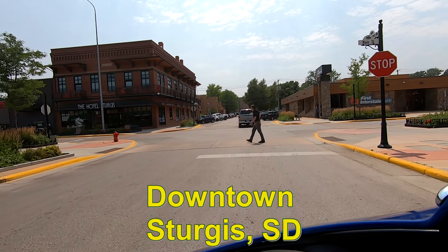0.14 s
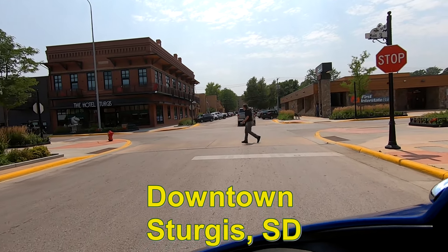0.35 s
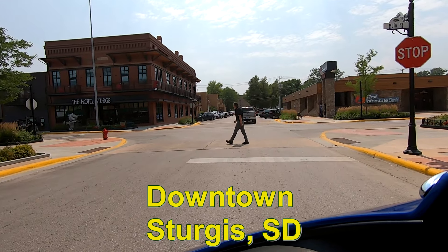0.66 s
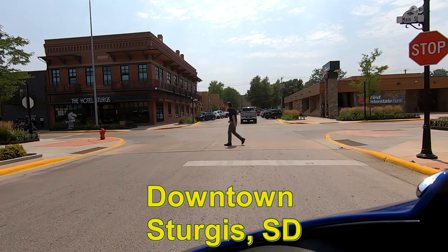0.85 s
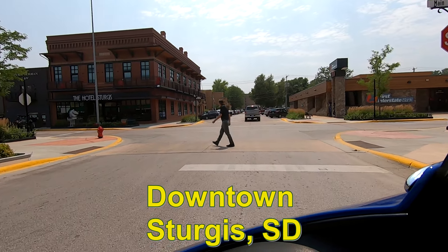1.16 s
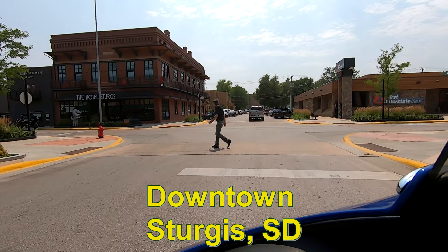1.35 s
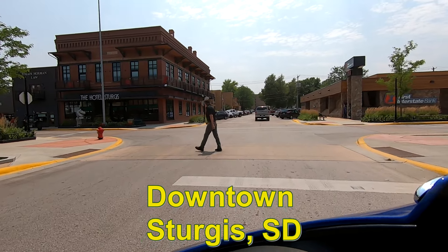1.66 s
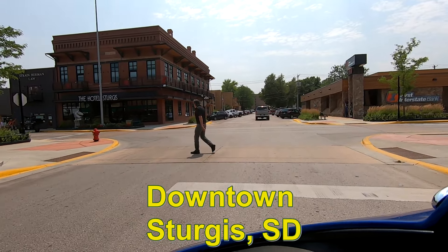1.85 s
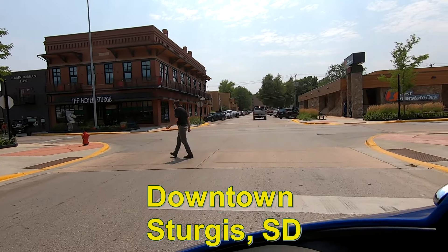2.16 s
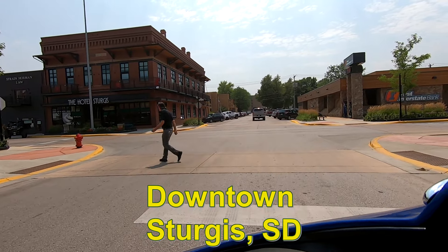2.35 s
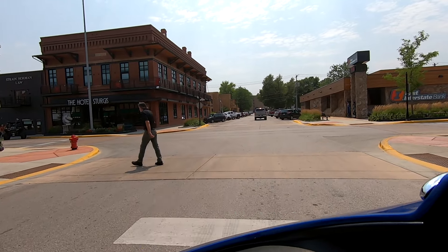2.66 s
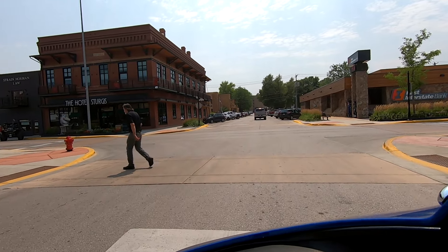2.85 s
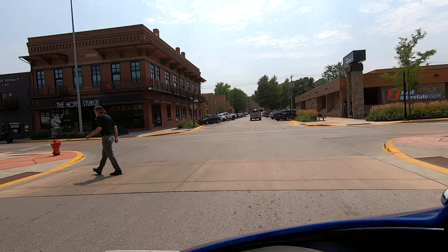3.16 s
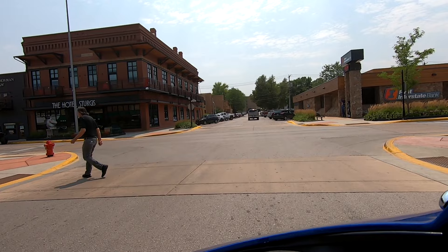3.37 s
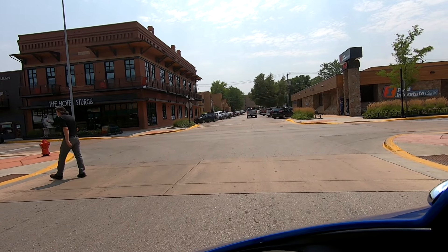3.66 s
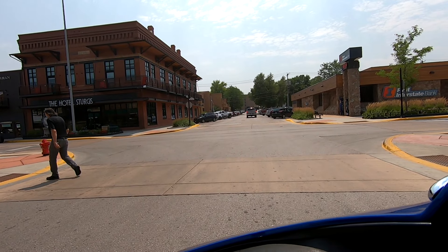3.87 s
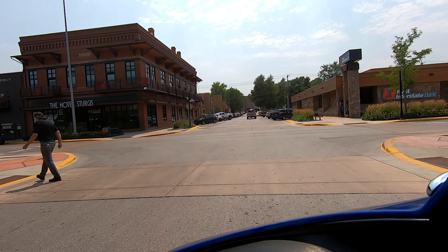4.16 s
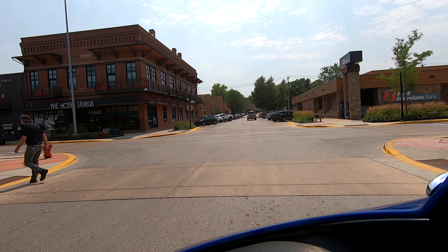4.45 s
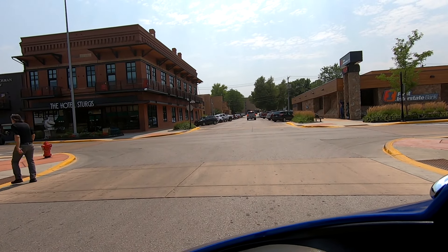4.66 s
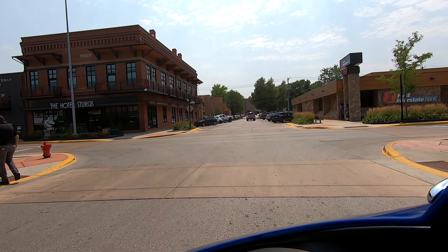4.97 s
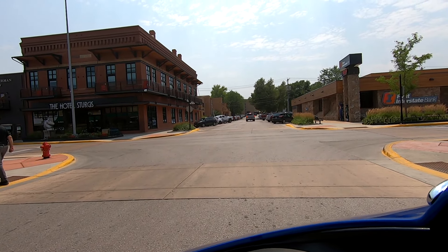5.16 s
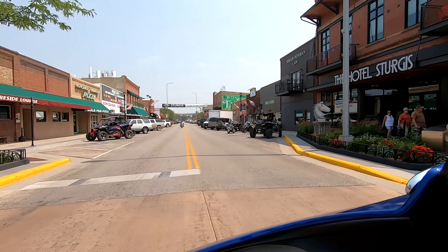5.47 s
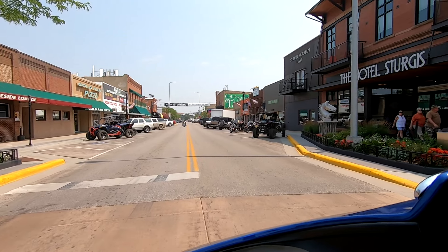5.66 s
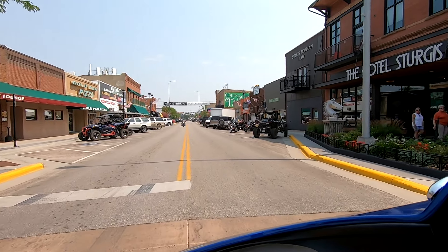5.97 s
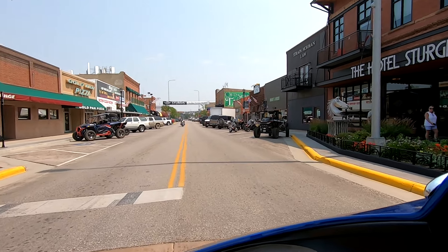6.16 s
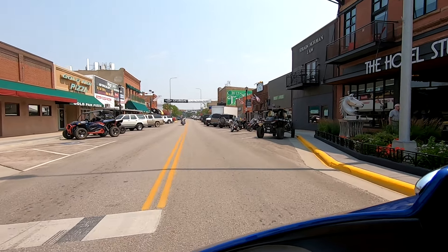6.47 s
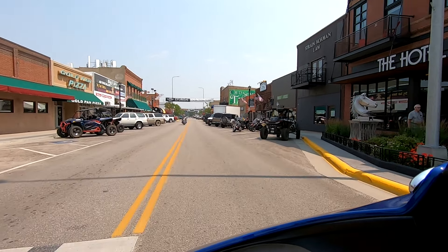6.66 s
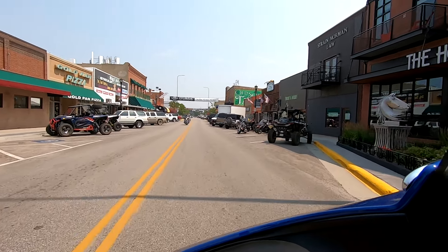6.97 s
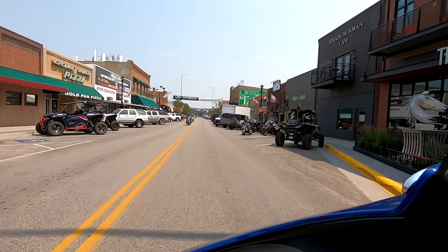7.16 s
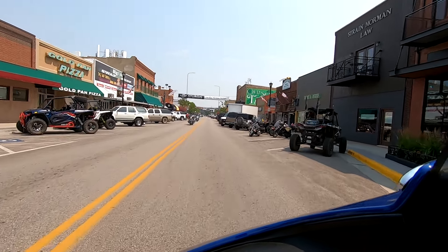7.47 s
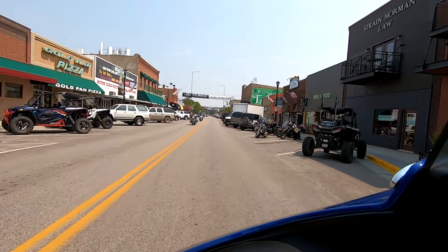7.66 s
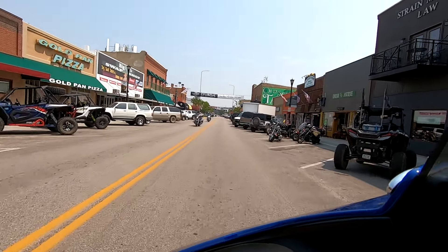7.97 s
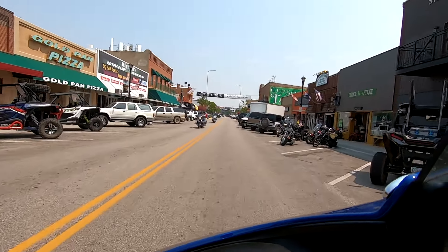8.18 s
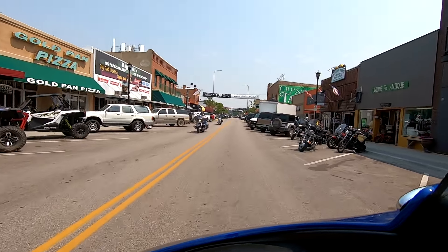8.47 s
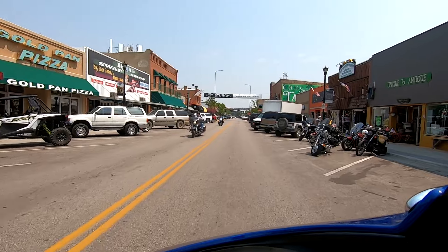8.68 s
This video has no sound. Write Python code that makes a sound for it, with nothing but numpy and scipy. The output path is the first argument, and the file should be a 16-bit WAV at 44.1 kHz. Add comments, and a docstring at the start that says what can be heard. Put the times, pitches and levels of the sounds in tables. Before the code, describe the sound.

A V-twin motorcycle lopes at idle, then barks and pulls away, settling into a higher gear as wind and road noise grow.

```python
"""A V-twin motorcycle, heard from the rider's seat, rolls up to a crossing at a loping idle.
Gas pulses ring its pipes over valve clatter and a whining chain; a brake squeaks twice.
The throttle opens with a hiss and a few barks, then the note jumps with a click to a steady pull.
The revs sink into a higher, singing gear while wind, road noise and small rattles grow."""
import sys
import numpy as np
from scipy.fft import rfft, irfft, next_fast_len
from scipy.io import wavfile
from scipy.ndimage import uniform_filter1d, map_coordinates

SR = 44100
rng = np.random.default_rng(int(sys.argv[2]) if len(sys.argv) > 2 else 0)


def wav_out(sig):
    """Save sig, one row per channel (or a flat mono array), as 16-bit PCM at SR to the path in sys.argv[1]."""
    wavfile.write(sys.argv[1], SR, np.round(np.clip(np.atleast_2d(sig).T, -1, 1) * 32767).astype(np.int16))


N = 388962
TIME = np.arange(N) / SR
OPEN_S, JUMP_S = 5.235, 5.408  # the throttle opens; the note jumps from idle to pull


def amp(db):
    """Decibels to gain."""
    return 10 ** (np.asarray(db) / 20)


def unit(x):
    """Scale to rms 1."""
    return x / np.sqrt(np.mean(x ** 2) + 1e-20)


def curves(rows):
    """One value per sample for each column after the time."""
    times, *columns = np.transpose(rows)
    return [np.interp(TIME, times, column) for column in columns]


def ramp(start, length):
    """Rises from 0 to 1 in length seconds."""
    return np.clip((TIME - start) / length, 0, 1)


def swell(peak_s, half_s):
    """A bell-shaped fade in and out."""
    return np.exp(-.5 * ((TIME - peak_s) / half_s) ** 2)


def speeding():
    """Rises from 0 to 1 as the bike gathers speed in the higher gear."""
    return ramp(7.95, .58)


def wobble(rate):
    """A smooth random curve, rate knots a second."""
    return map_coordinates(rng.standard_normal(int(N * rate / SR) + 4), [TIME * rate])


def filtered(x, response):
    """x through a complex frequency response."""
    size = next_fast_len(len(x) + SR // 4)
    return irfft(rfft(x, size) * response(np.fft.rfftfreq(size, 1 / SR)), size)[:len(x)]


def noise(spectrum):
    """Noise of rms 1 coloured by (Hz, dB) points."""
    freqs, db = np.transpose(spectrum)
    colour = lambda hz: amp(np.interp(np.log(hz + 1), np.log(freqs), db))
    return unit(filtered(rng.standard_normal(N), colour))


def band(centre, octaves, size=N):
    """Noise of rms 1 in a bell-shaped band around centre Hz."""
    bell = lambda hz: np.exp(-.5 * (np.log2((hz + 1) / centre) / octaves) ** 2)
    return unit(filtered(rng.standard_normal(size), bell))


def knocks(rows, octaves, t60):
    """Short ringing bursts, each around its own centre frequency."""
    out, t = np.zeros(N + SR), np.arange(SR // 4) / SR
    attack = 1 - np.exp(-t / .0008)
    for start, db, hz in rows:
        out[round(start * SR):][:len(t)] += amp(db - 60 * t / t60) * attack * band(hz, octaves, len(t))
    return out[:N]


def cycles(rpm):
    """Engine cycles run so far: one for every two turns of the crank."""
    return np.cumsum(np.interp(TIME, *np.transpose(rpm), left=0)) / (120 * SR)


def pulses(cycle, place, rise, scatter_db, jitter):
    """One pulse a cycle, quick to rise and slower to fall, each with its own size and timing."""
    count = np.floor(cycle - place + rise).astype(int) + 2
    size, late = rng.standard_normal((count.max() + 1, 2)).T
    age = np.maximum((cycle - place + 2 - count - jitter * late[count]) / rise, 0)
    return amp(scatter_db * size[count]) * age * np.exp(1 - age)


def gas_flow(cycle, strokes, jitter):
    """Gas flow of both cylinders; the pulses that vary most in size also wander most in time."""
    return sum(push * pulses(cycle, place, rise, scatter, jitter * scatter)
               for place, push, rise, scatter in strokes)


def slow_level(x, size):
    """Running rms, smoothed twice over size samples."""
    power = uniform_filter1d(uniform_filter1d(x ** 2, size), size)
    return np.sqrt(np.abs(power) + 1e-6)


def exhaust(flow, pipes, lag, squeeze):
    """Gas pulses ring the pipes at a held level, higher notes leaving later by lag s per 100 Hz."""
    ring = lambda f: sum(gain * 1j * f * width / (hz * hz - f * f + 1j * f * width)
                         for hz, width, gain in pipes)
    sweep = lambda f: np.exp(-1j * np.pi * lag * np.minimum(f, 600) ** 2 / 100)
    boom = filtered(flow, lambda f: ring(f) * sweep(f))
    # the strongest pulses are squeezed down, which evens out the throb
    surge = slow_level(boom, 400) / slow_level(boom, 11000)
    boom = boom / (1 + (surge / 1.2) ** 4) ** squeeze
    return boom / slow_level(boom, 11000)


def burble(cycle, place, hz, steady):
    """Turbulent gas flutters in the pipe, most strongly once a cycle."""
    return unit(band(hz, .17) * (steady + pulses(cycle, place, rise=.07, scatter_db=2, jitter=.01)))


def clatter(cycle, spectrum, depth, rise, patchy_db):
    """Metal noise that swells as the valves of each cylinder work."""
    first, second = (pulses(cycle, place, rise, scatter_db=1.7, jitter=.004) for place in (.71, .2))
    return unit(noise(spectrum) * (1 + depth * (first + .7 * second)) * amp(patchy_db * wobble(170)))


def sharp_ticks(cycle):
    """Envelope of the sharp injector ticks, one per cylinder."""
    return sum(pulses(cycle, place, rise=.016, scatter_db=.8, jitter=.01) for place in (.725, .22))


# The wandering idle. Each row: time in seconds, crank speed in rpm.
IDLE_RPM = [(0, 961), (1.29, 996), (1.54, 938), (2.08, 1014), (2.54, 940), (3.14, 986), (3.34, 935),
            (3.89, 1049), (4.51, 977)]
# One fader that burble, chuffs and clatter each follow in part. Each row: time in seconds, swing in dB.
MECHANICAL_SWING = [(0, 0), (1.3, -2), (2.2, -6.5), (2.75, -4.5), (3.1, -1.5), (3.9, 6), (5.2, 1.5)]

def idle():
    """The twin lopes on an unevenly turning crank, with chuffs, clatter and chain whine."""
    cycle = cycles(IDLE_RPM) + .003 * wobble(12)
    swing_db, = curves(MECHANICAL_SWING)
    opened = ramp(OPEN_S, .019)
    gas = idle_beat(cycle, swing_db, opened) + chuffs(cycle, swing_db)
    return gas + idle_clatter(cycle, swing_db, opened) + (1 - opened) * chain(cycle)


# Two exhaust blows, then the intake swings. Each row: place in the cycle from 0 to 1, push,
# rise in cycles, scatter in dB.
IDLE_STROKES = [(.486, 1.85, .0115, .5), (.918, .95, .008, 1.8), (.275, 1.2, .0424, .6),
                (.245, .8, .0405, .6), (.84, .85, .033, 1.3)]
# Pipe and airbox resonances at idle. Each row: pitch in Hz, width in Hz, signed gain.
IDLE_RESONANCES = [(65.1, 18.4, 0.53), (123.8, 24.7, -1.42), (156, 28, 1.195), (163.1, 15, -1.45),
                   (190.7, 23, -0.17)]
# Weak firings leave gaps in the beat. Each row: time in seconds, dip in dB.
WEAK_FIRINGS = [(.395, -10), (.645, -7), (.885, -5), (1.13, -4), (1.495, -7), (2.22, -5), (2.73, -8),
                (3.955, -9), (4.19, -9), (4.92, -4)]

def idle_beat(cycle, swing_db, opened):
    """Soft gas pulses boom in the pipes and sag at each weak firing."""
    flow = filtered(gas_flow(cycle, IDLE_STROKES, jitter=.0038), lambda hz: 1 / (1 + (hz / 330) ** 6))
    # the engine is already running, so the pipes ring from one cycle earlier
    lead_in = flow[:round(120 * SR / IDLE_RPM[0][1])]
    boom = exhaust(np.r_[lead_in, flow], IDLE_RESONANCES, lag=.0083, squeeze=.15)[-N:]
    flutter = amp(-13.5 + .28 * swing_db) * burble(cycle, place=.26, hz=190.1, steady=.44)
    sag_db = sum(db * swell(time, half_s=.014) for time, db in WEAK_FIRINGS)
    return amp(-16.5 - .5 * opened + sag_db) * (boom + flutter)


# The breath in the beat. Each row: place in the cycle from 0 to 1, strength.
CHUFF_STROKES = [(.005, .55), (.295, .55), (.54, 1)]

def chuffs(cycle, swing_db):
    """Gas chuffs out with each stroke."""
    puffs = sum(strength * pulses(cycle, place, rise=.025, scatter_db=2, jitter=.006)
                for place, strength in CHUFF_STROKES)
    return amp(-44.5 + .5 * swing_db) * unit(puffs * band(266, .29))


# Tone of the hollow casing, bright metal and ticks. Each row: frequency in Hz, relative level in dB.
CASING_TONE = [(200, -29), (300, -4), (420, -13), (520, -2), (670, -3.5), (785, -2.5), (920, -16.5),
               (1150, -13.5), (1400, -18), (1700, -40), (3000, -61)]
IDLE_METAL_TONE = [(880, -21), (1500, -1), (1730, -5), (2750, -2), (3120, -3), (4290, -11), (4630, -11.5),
                   (5840, -17), (6360, -18.5), (6680, -18.5), (8410, -20.5), (9450, -28.5), (10200, -28),
                   (12600, -38), (15000, -48.5)]
TICK_TONE = [(2000, -59), (7000, -19), (9300, -19), (10200, 3), (11000, -15.5), (12200, -5.5), (15000, -42)]
# The ticks come earlier as the bike rolls on. Each row: time in seconds, advance in cycles.
TICK_ADVANCE = [(4, 0), (4.85, .11), (5.2, .06)]

def idle_clatter(cycle, swing_db, opened):
    """Valves shake the casing and injectors tick, all louder once the throttle opens."""
    casing = amp(-41.5) * clatter(cycle, CASING_TONE, depth=.6, rise=.04, patchy_db=1.5)
    metal = amp(-53.5) * clatter(cycle, IDLE_METAL_TONE, depth=.21, rise=.044, patchy_db=1.26)
    advance, = curves(TICK_ADVANCE)
    ticking = sharp_ticks(cycle + advance)
    ticks = amp(-83) * unit(ticking * noise(TICK_TONE))
    ring = amp(-65) * unit(ticking * band(2270, .044))
    bright = amp(.37 * swing_db + 5.5 * opened) * (metal + ticks + ring)
    return amp(.5 * swing_db + 4.5 * opened) * casing + bright


# The primary chain's fader. Each row: time in seconds, level in dB.
CHAIN_LEVEL = [(0, -41.5), (1.55, -39), (2, -45), (2.4, -40), (2.67, -39), (2.8, -47.5), (3, -38),
               (3.5, -38), (3.9, -38.5), (4.4, -36), (4.7, -39.5), (5.2, -38)]
# Its snatches. Each row: place in the cycle from 0 to 1, strength.
CHAIN_SNATCHES = [(.085, .85), (.275, .85), (.5, .3), (.6, 1.1), (.725, .65), (.975, .9)]

def chain(cycle):
    """The chain whines at its tooth rate in sagging snatches, which run together as the revs rise."""
    teeth, slack_rpm, taut_rpm = 35, 960, 1060
    snatch_cycles, wander_rad, sag_rad = .039, .75, .33
    phase = 2 * np.pi * 2 * teeth * cycle
    rpm, = curves(IDLE_RPM)
    taut = np.clip((rpm - slack_rpm) / (taut_rpm - slack_rpm), 0, 1)
    whine = .4 * taut * np.sin(phase + wander_rad * wobble(7))
    for place, strength in CHAIN_SNATCHES:
        offset = ((cycle - place + .5) % 1 - .5) / snatch_cycles
        pull = (1 - .5 * taut) * strength * np.exp(-.5 * offset ** 2) * amp(1.9 * wobble(8.3))
        whine += pull * np.sin(phase + wander_rad * wobble(9) - sag_rad * offset ** 2)
    level_db, = curves(CHAIN_LEVEL)
    return amp(level_db) * unit(whine)


# The wind's rumble. Each row: frequency in Hz, relative level in dB.
WIND_TONE = [(6, -16.5), (15, 0), (30, -13), (60, 0.5), (200, -36), (500, -93)]
# Single gusts. Each row: peak time in seconds, level in dB.
WIND_GUSTS = [(1.76, -21.5), (2.26, -27.5), (6.329, -33)]

def wind():
    """Low buffeting behind the fairing: a few gusts, and more of it with speed."""
    level_db = np.where(TIME < JUMP_S, -32, -36 + 15.5 * speeding())
    buffeting = unit(noise(WIND_TONE) * amp(1.1 * wobble(3.1)))
    gusts = sum(amp(db) * swell(peak, half_s=.073) for peak, db in WIND_GUSTS)
    return amp(level_db) * buffeting + gusts * band(26, .21)


# Two thin squeaks. Each row: peak time in seconds, level in dB, pitch in Hz, half length in seconds.
BRAKE_SQUEAKS = [(2.638, -60, 6170, .018), (2.875, -55, 6340, .022)]

def brake():
    """The disc sings briefly on one slightly rising tone."""
    out = np.zeros(N)
    for peak, db, hz, half_s in BRAKE_SQUEAKS:
        pitch = hz * (1 + .006 * np.tanh((TIME - peak) / half_s) + .002 * wobble(94))
        out += amp(db) * swell(peak, half_s) * np.sin(2 * np.pi * np.cumsum(pitch) / SR)
    return out


# Dull clunks and bright ticks. Each row: start in seconds, level in dB, centre in Hz.
GEARBOX_CLUNKS = [(4.837, -31, 1050), (5.237, -37, 1000), (5.288, -33, 935), (5.562, -29.5, 700),
                  (6.877, -35, 600), (6.939, -32, 696), (7.129, -33, 650), (7.384, -30, 735),
                  (8.231, -28, 700)]
LEVER_TICKS = [(4.837, -42, 4400), (4.838, -52, 9600), (7.275, -36.5, 3600), (7.868, -37.5, 2570),
               (8.245, -33, 3430), (8.655, -43, 4400)]

def gearbox_and_levers():
    """The gearbox and driveline clunk; levers and fittings tick."""
    return knocks(GEARBOX_CLUNKS, octaves=.6, t60=.044) + knocks(LEVER_TICKS, octaves=.48, t60=.041)


# Layers of one short hiss. Each row: start in seconds, level in dB, centre in Hz, rise in seconds.
THROTTLE_HISS = [(5.236, -40, 6700, .005), (5.244, -41, 4700, .008), (5.236, -39, 2700, .004),
                 (5.236, -52, 10800, .005)]

def throttle():
    """Air hisses past the opening throttle plate."""
    out, t = np.zeros(N + SR), np.arange(SR // 4) / SR
    for start, db, hz, rise in THROTTLE_HISS:
        envelope = t / rise * np.exp(1 - t / rise)
        out[round(start * SR):][:len(t)] += amp(db) * envelope * band(hz, .17, len(t))
    return out[:N]


# Nasal honks. Each row: start in seconds, level in dB, centre in Hz.
AIRBOX_GULPS = [(5.236, -26, 785), (5.259, -29, 790), (5.259, -29.5, 1180), (5.286, -24, 1230),
                (5.290, -33, 740), (5.301, -19, 745), (5.341, -36, 1220)]

def airbox():
    """The airbox honks as the engine gulps air."""
    return knocks(AIRBOX_GULPS, octaves=.13, t60=.05)


# Single hard firings. Each row: start in seconds, level in dB.
HARD_FIRINGS = [(5.2574, -5), (5.309, -4), (5.341, -9.5), (5.3822, -3)]

def barks():
    """The first firings on the open throttle: each a thump of the pipe under a short rasp."""
    thump_hz, rise_s, rasp_t60 = 139, .0023, .086
    out, t = np.zeros(N + SR), np.arange(SR // 4) / SR
    thump = t / rise_s * np.exp(1 - t / rise_s) * np.sin(2 * np.pi * thump_hz * t)
    attack = 1 - np.exp(-t / .001)
    for start, db in HARD_FIRINGS:
        rasp = amp(-12.5 - 60 * t / rasp_t60) * attack * band(259, .6, len(t))
        out[round(start * SR):][:len(t)] += amp(db) * (thump + rasp)
    return out[:N]


def click():
    """One sharp click where the note jumps."""
    return amp(-14.5) * (TIME >= JUMP_S) * np.exp(-np.abs(TIME - JUMP_S) / .0002)


# The revs hold, then sink into the higher gear. Each row: time in seconds, crank speed in rpm.
RIDE_RPM = [(5.41, 2658), (5.53, 2721), (6.5, 2686), (6.9, 2457), (7.3, 1938), (7.55, 1772), (7.8, 1898),
            (8, 1857), (8.25, 1944)]
# Tone of the rasp under load and the bright clatter. Each row: frequency in Hz, relative level in dB.
RASP_TONE = [(190, -30), (295, -3.5), (387, -10), (524, -15), (549, -14.5), (692, -16.5), (719, -11),
             (789, -9.5), (1180, -37.5), (1600, -27), (2080, -39.5), (3520, -120)]
RIDE_METAL_TONE = [(820, -5.5), (1400, -1), (1520, -6.5), (1940, 1), (2590, -5.5), (3160, -1.5), (3520, -7),
                   (5190, -14), (6520, -20.5), (9040, -27.5), (9690, -32.5), (10500, -35.5), (11800, -41.5),
                   (15000, -52)]

def ride():
    """A steady, rasping pull eases to a light cruise; the road comes up and a gear sings."""
    pull_load, cruise_load = .94, .062
    start, start_rpm = RIDE_RPM[0]
    cycle = cycles(RIDE_RPM) + np.minimum(TIME - start, 0) * start_rpm / 120  # turning as it fades in
    cycle -= np.floor(cycle[0])
    eased = ramp(6.55, .71)
    load = pull_load + (cruise_load - pull_load) * eased
    boom = ride_beat(cycle, load)
    rasp = amp(-40) * np.sqrt(load) * clatter(cycle, RASP_TONE, depth=.89, rise=.013, patchy_db=1)
    roar = eased * road()
    metal = clatter(cycle, RIDE_METAL_TONE, depth=.65, rise=.012, patchy_db=1)
    metal *= amp(-46 + 2.5 * speeding())
    whine = gear(cycle)
    ticks = amp(-84) * unit((.3 + sharp_ticks(cycle)) * band(10170, .012))
    return boom + rasp + load * covers(cycle) + roar + metal + whine + ticks


# Exhaust blows, then intake swings, on and off load. Each row: place in the cycle from 0 to 1, push,
# rise in cycles, scatter in dB.
PULL_STROKES = [(.093, 2.105, .015, .3), (.508, 1.071, .026, .4), (.443, -.959, .073, .4),
                (.055, -1.089, .035, .4)]
CRUISE_STROKES = [(.152, 1.031, .013, .5), (.595, 1, .004, 1), (.37, .8, .004, 1), (.844, -.3, .079, 1)]
# Pipe and airbox resonances on the ride. Each row: pitch in Hz, width in Hz, signed gain.
RIDE_RESONANCES = [(35, 14, .16), (69.9, 15.5, -1.15), (126, 14, 3.2), (205.6, 44, -1.15),
                   (218.4, 21.6, 1.05), (261, 14, -.16)]

def ride_beat(cycle, load):
    """Under load the gas pulses are strong and even; as it eases they turn ragged."""
    flow = load * gas_flow(cycle, PULL_STROKES, jitter=.0034)
    flow += (1 - load) * gas_flow(cycle, CRUISE_STROKES, jitter=.0038)
    boom = exhaust(flow, RIDE_RESONANCES, lag=0, squeeze=.16)
    flutter = amp(-10.5) * (1 - load) * burble(cycle, place=.64, hz=194.5, steady=.64)
    throb = 1 + .14 * (1 - load) * np.cos(2 * np.pi * (cycle - .11))  # off load one beat stands out
    return amp(-16.5 + 3.5 * load ** 2) * throb * (boom + flutter)


# The whir of the engine covers. Each row: pitch in Hz, level at full load in dB.
COVER_RINGS = [(1707, -62.5), (2000, -63.5), (2140, -62.5), (3080, -67.5)]

def covers(cycle):
    """The engine covers ring in narrow bands, shaken by each stroke; one swells during the pull."""
    rings = sum(amp(db) * band(hz, .016) for hz, db in COVER_RINGS)
    rings += amp(-53) * swell(5.92, half_s=.12) * band(2180, .05)
    shakes = sum(pulses(cycle, place, rise=.05, scatter_db=2, jitter=.01) for place in (.33, .6, .74))
    return rings * unit(.3 + shakes)


# The road's dull roar. Each row: frequency in Hz, relative level in dB.
ROAD_TONE = [(160, -40.5), (280, -2), (315, -4.5), (540, -9.5), (589, -9.5), (707, -11.5), (1030, -18.5),
             (1600, -29), (2080, -56), (3520, -120)]

def road():
    """The road roars with a rough grain, louder with speed."""
    roar = unit(noise(ROAD_TONE) * amp(.81 * wobble(12) + 1.3 * wobble(90)))
    return amp(-36 + 5 * speeding()) * roar


# Bumps in the road. Each row: start in seconds, rattle level in dB, centre in Hz.
FAIRING_BUMPS = [(6.93, -51.5, 1710), (7.07, -52.5, 3580), (8.09, -51, 4380), (8.38, -48, 2000)]

def fairing():
    """Each bump sets the fairing rattling in small, uneven contacts that slowly settle."""
    contacts_per_s, scatter_db, decay_s, fade_db_per_s = 380, 2.5, .001, 12.5
    out = np.zeros(N)
    for start, db, hz in FAIRING_BUMPS:
        contacts = (rng.random(N) < contacts_per_s / SR) * amp(scatter_db * rng.standard_normal(N))
        chatter = filtered(contacts, lambda f: 1 / (1 + 2j * np.pi * f * decay_s) ** 2)
        level = amp(db - fade_db_per_s * np.maximum(TIME - start, 0)) * ramp(start, .043)
        out += level * unit(chatter * band(hz, .29))
    return out


# Small, bright pings. Each row: start in seconds, level in dB, centre in Hz.
FITTING_PINGS = [(7.184, -37, 3020), (7.502, -40, 3070), (8.015, -49, 3070), (8.143, -41, 3080),
                 (8.243, -42, 3330), (8.376, -38, 3200), (8.451, -43, 3200), (8.516, -43, 3030)]

def loose_fitting():
    """A loose fitting pings on the rough road."""
    return knocks(FITTING_PINGS, octaves=.054, t60=.042)


def gear(cycle):
    """The higher gear takes up the drive and sings."""
    teeth_per_cycle = 62
    level = amp(-49.5 + wobble(9.6)) * ramp(7.3, .25)
    return level * np.sin(2 * np.pi * teeth_per_cycle * cycle + .5 * wobble(25))


# Body and sheen of the rush. Each row: centre in Hz, level in dB.
RUSH_BANDS = [(780, -49), (3800, -53.5)]

def rush():
    """A smooth rush of air and tyres swells as the bike runs past parked cars."""
    return swell(8.55, half_s=.15) * sum(amp(db) * band(hz, .36) for hz, db in RUSH_BANDS)


def scene():
    """Idle, then the ride, with the small sounds on top."""
    riding = ramp(JUMP_S - .002, .004)
    engine = (1 - riding) * (idle() + barks()) + riding * ride() + airbox()
    hits = gearbox_and_levers() + click() + loose_fitting() + fairing()
    return (engine + hits + throttle() + brake() + wind() + rush())[None]


def record(dry):
    """Rounds off the highest peaks and cuts the very top of the treble."""
    ceiling, top_hz = .68, 15700
    soft = dry[0] / (1 + np.abs(dry[0] / ceiling) ** 8) ** (1 / 8)
    return filtered(soft, lambda hz: 1 / (1 + (hz / top_hz) ** 80))[None]


dry = scene()
out = record(dry)
wav_out(out)
```